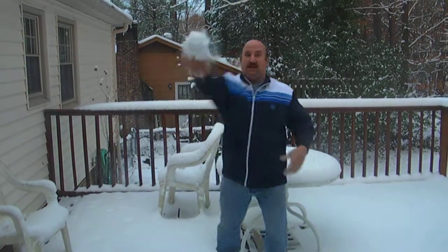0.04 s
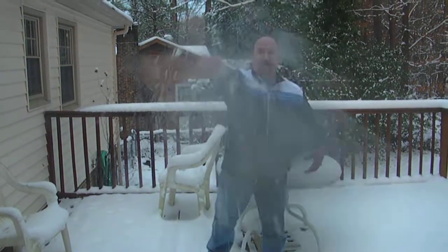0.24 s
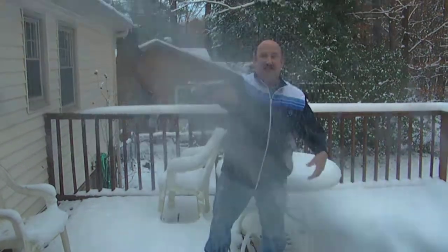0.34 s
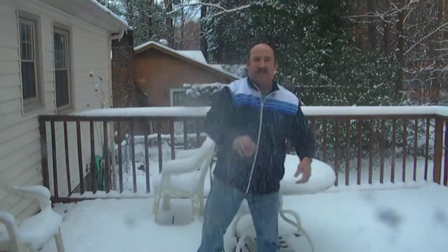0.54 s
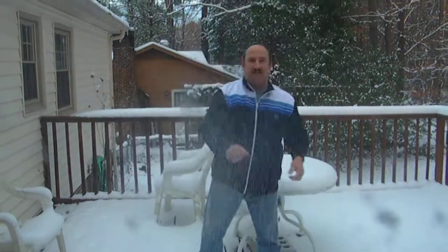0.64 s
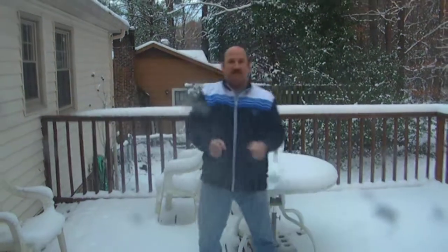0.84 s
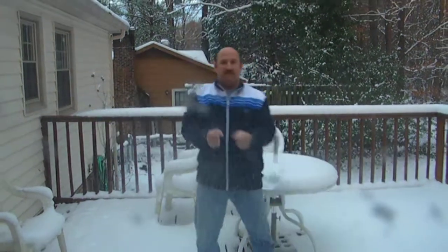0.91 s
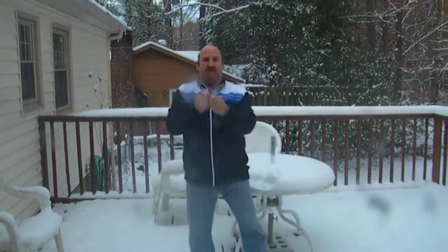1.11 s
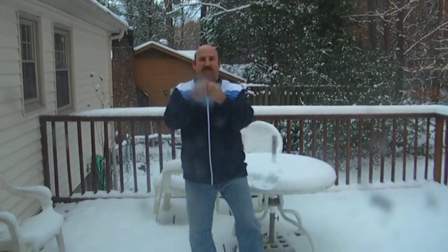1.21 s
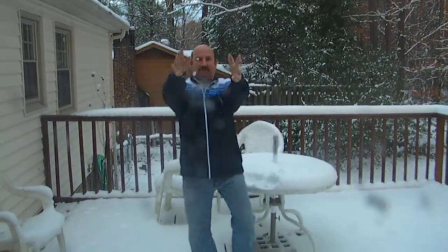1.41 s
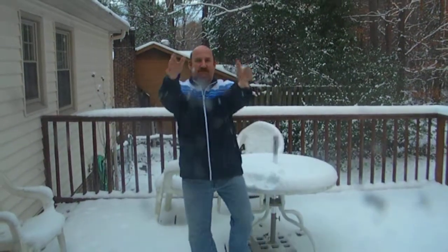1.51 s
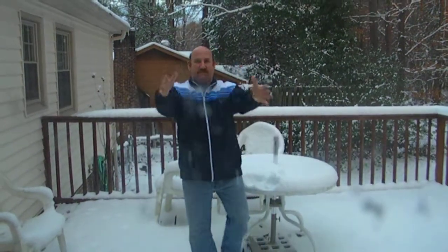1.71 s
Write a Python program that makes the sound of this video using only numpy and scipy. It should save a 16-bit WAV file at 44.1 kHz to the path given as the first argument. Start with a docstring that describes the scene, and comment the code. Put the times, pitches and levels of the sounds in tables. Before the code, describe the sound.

Snowball bursts against window glass, booming and rumbling, followed by faint microphone handling knocks.

```python
"""Quiet hum and hiss run throughout. At 0.24 s a snowball bursts on a large, close window pane
and briefly overloads the microphone. The snow smacks and crunches; the pane booms and rings on
in its low modes. Crumbs tick down the glass. From 0.6 s, soft handling knocks ring the camera's
case, each with a rustle; a second group follows at 1.6 s."""
import sys
import numpy as np
from scipy import signal
from scipy.fft import rfft, irfft
from scipy.io import wavfile

SR = 44100
rng = np.random.default_rng(int(sys.argv[2]) if len(sys.argv) > 2 else 0)


def dump(signal):
    """Clip the signal to [-1, 1] and save it as 16-bit WAV at the path in sys.argv[1]."""
    limited = np.clip(np.atleast_2d(signal).T, -1, 1)
    pcm = np.round(limited * 32767).astype(np.int16)
    wavfile.write(sys.argv[1], SR, pcm)


N = 77175
T = np.arange(N) / SR
HIT_S = 0.2417
PUSH_S = HIT_S + 0.0003   # the ball's loose outside yields first
BANDWIDTH_HZ = 8300


def pane():
    """One push shoves the window in its frame; low modes build up, dense upper modes ring at once."""
    # damped motion of the whole window: (frequency [Hz], level [dB], t60 [s])
    shove_modes = [(73.2, -2, .17), (148, 8, 0.047)]
    # low bending modes: (frequency [Hz], level [dB], t60 [s])
    low_modes = [(23, -25, .8), (37.32, -24.5, 2.6), (44.04, -10.5, 1.56), (57.73, -18.5, 1.7),
                 (60, -19.5, 0.39), (72.8, -24, 1.6), (82.5, -19, 1.93), (96.4, -17, 1.3),
                 (101.3, -18, 1.1), (105.7, -28, 2.9), (116.6, -20, 1.69), (142.7, -14.5, 2.024),
                 (155.9, -21.5, 1.47), (177.6, -22.5, 1.62), (185.7, -19.5, 1.57), (216.7, -15, 1.33),
                 (223.7, -1.5, 0.21), (245.9, -13, 0.76), (288.6, -18, 0.78), (300.9, -19.5, 0.88),
                 (327.3, -20.5, .33), (354.7, -24.5, 0.77), (375, -31, 1.48), (431.5, -33.5, 1.22),
                 (479, -31.5, 0.49), (462, -34.5, 0.53), (582, -21.5, 0.59), (620, -21, 0.31),
                 (900, -26.5, .4)]
    # upper mode heights: (frequency [Hz], level [dB])
    upper_spectrum = [(260, -26), (420, -33.5), (600, -42), (720, -47), (1000, -53), (1400, -60),
                      (2200, -56)]
    contact_s, build_up_s, upper_count = 0.001506, 0.015, 44
    force = push(PUSH_S, contact_s)
    shove = ring_alternating(force, shove_modes)
    build_up = np.clip((T - HIT_S) / build_up_s, 0, 1)   # bending waves return from the frame
    low = build_up * sum(from_db(db) * ring(force, hz, t60_s) for hz, db, t60_s in low_modes)
    upper_hz = np.geomspace(upper_spectrum[0][0], upper_spectrum[-1][0], upper_count)
    upper_hz *= 1 + 0.015 * rng.standard_normal(upper_count)
    sharp_force = push(PUSH_S, contact_s / 4)
    upper = np.zeros(N)
    for hz, sign in zip(upper_hz, rng.choice([-1, 1], upper_count)):
        t60_s = 0.81 * (500 / hz) ** 0.35
        upper += sign * from_db(db_at(upper_spectrum, hz)) * ring(sharp_force, hz, t60_s)
    return shove + upper - low


def snowball():
    """The ball flattens with a dull smack, collapses in a lumpy crunch and leaves a tinkling spray."""
    # packed snow flattening: (frequency [Hz], relative density [dB])
    smack_spectrum = [(400, 3), (600, 9), (720, -3), (900, -2.5), (1300, -10.5), (2000, -21), (4000, -43)]
    # snow fracturing: (frequency [Hz], relative density [dB])
    crunch_spectrum = [(900, -18), (2000, -13), (3000, -3), (3800, 2.5), (5500, 0.5), (8000, -3)]
    # fine snow showering: (frequency [Hz], relative density [dB])
    spray_spectrum = [(700, 10), (1400, 3.5), (2200, -9), (3000, -1), (3800, -1.5), (5000, -0.5),
                      (8000, -10.5)]
    lump_s, lump_spread_db = 0.0027, 2
    tinkle_hz, tinkle_width_hz = 3750, 350
    smack = from_db(-16) * envelope(PUSH_S, attack_s=0.002, t60_s=0.097)
    smack *= colour(rng.standard_normal(N), smack_spectrum)
    lumps = from_db(lump_spread_db * np.interp(T / lump_s, np.arange(N), rng.standard_normal(N)))
    crunch = from_db(-20) * lumps * envelope(HIT_S, attack_s=0.0004, hold_s=0.006, t60_s=0.058)
    crunch *= colour(grains(per_s=6000), crunch_spectrum)
    spray = from_db(-44.5) * envelope(HIT_S, attack_s=0.015, t60_s=1.0)
    spray *= colour(grains(per_s=9500), spray_spectrum)
    b, a = signal.iirpeak(tinkle_hz, tinkle_hz / tinkle_width_hz, fs=SR)
    tinkle = from_db(-54) * envelope(HIT_S, attack_s=0.015, hold_s=0.093, t60_s=0.32)
    tinkle *= unit_rms(signal.lfilter(b, a, grains(per_s=220)))
    return smack + crunch + spray + tinkle


def crumbs():
    """Each crumb ticks on the glass: a short cluster of grains in one resonance."""
    # crumb impacts: (time [s], level [dB], pitch [Hz], bandwidth / pitch before the cap [-], t60 [s])
    ticks = [(.2862, -31, 3540, 0.54, 0.0085), (0.3105, -41, 3630, 0.61, .014),
             (0.3186, -31.5, 3400, 0.69, 0.0061), (.361, -43, 3300, 1.0, 0.034),
             (0.4267, -47, 3585, 0.17, 0.079), (0.465, -47.5, 4470, 1.39, 0.16),
             (.599, -47.5, 3700, 1.16, 0.032), (1.2759, -37, 2950, 2.8, 0.014)]
    out = np.zeros(N)
    for start_s, db, hz, width, t60_s in ticks:
        b, a = signal.iirpeak(hz, 1 / min(width, 2), fs=SR)
        grit = signal.lfilter(b, a, signal.lfilter(b, a, grains(per_s=7300)))
        out += from_db(db) * envelope(start_s, attack_s=0.00078, t60_s=t60_s) * unit_rms(grit)
    return out


def handling_knocks():
    """Soft contacts ring the case briefly, each with a little rustle."""
    # touches on the case: (time [s], force level [dB], rustle level [dB])
    contacts = [(0.614, -44, -48.5), (.634, -48, -52), (.659, -57, -45.5), (0.702, -42, -50.5),
                (.777, -51.5, -51), (.809, -33, -49), (0.833, -47, -52), (0.868, -43, -58),
                (0.901, -48, -48.5), (.935, -44.5, -53), (.971, -57, -51), (1.021, -34.5, -47),
                (1.069, -41.5, -53), (1.63, -43, -46), (1.672, -46, -51), (1.701, -45.5, -53.5),
                (1.743, -35, -44.5)]
    # case resonances: (frequency [Hz], level [dB], t60 [s])
    case_modes = [(236.6, 5.5, 0.065), (319, 6.5, .05)]
    # rubbing noise: (frequency [Hz], relative density [dB])
    rustle_spectrum = [(400, -36), (700, 0), (1100, 1), (1700, -7), (2600, -13), (8000, -12.5)]
    force = sum(from_db(db) * push(start_s, length_s=0.002) for start_s, db, _ in contacts)
    thuds = ring_alternating(force, case_modes)
    rubbing = sum(from_db(db) * envelope(start_s, attack_s=0.0027, t60_s=0.052)
                  for start_s, _, db in contacts)
    return thuds + rubbing * colour(rng.standard_normal(N), rustle_spectrum)


def hum_and_hiss():
    """Steady hum and a thin electronic whine over even hiss."""
    # hum and whine: (frequency [Hz], rms level [dB])
    tones = [(59.2, -45.5), (199.2, -59.5), (409, -63.5), (969, -72.5), (7731, -68), (8269, -75)]
    # noise floor: (frequency [Hz], relative density [dB])
    hiss_spectrum = [(47, -39.5), (80, -1.5), (135, -2), (173, -6), (206, -4), (231, -8), (333, -15),
                     (374, -13), (420, -14), (679, -18), (979, -20.5), (1260, -23.5), (8000, -24),
                     (10400, -72), (17600, -120)]
    hum = sum(np.sqrt(2) * from_db(db) * np.sin(2 * np.pi * (hz * T + rng.random())) for hz, db in tones)
    return hum + from_db(-49.5) * colour(rng.standard_normal(N), hiss_spectrum)


def from_db(db):
    """Decibels to gain."""
    return 10 ** (np.asarray(db) / 20)


def unit_rms(x):
    """Scale to rms 1."""
    return x / np.sqrt(np.mean(x ** 2) + 1e-20)


def db_at(spectrum, hz):
    """Interpolate a spectrum on a log-frequency axis."""
    points_hz, points_db = np.transpose(spectrum)
    return np.interp(np.log(hz + 1e-3), np.log(points_hz), points_db)


def colour(noise, spectrum):
    """Shape noise to a spectrum, rolled off below its first point and cut at BANDWIDTH_HZ; rms 1."""
    hz = np.arange(N // 2 + 1) * SR / N
    edges = (hz < BANDWIDTH_HZ) * np.minimum(hz / spectrum[0][0], 1) ** 2
    return unit_rms(irfft(rfft(noise) * from_db(db_at(spectrum, hz)) * edges, N))


def envelope(start_s, attack_s, t60_s, hold_s=0):
    """Linear rise, hold, exponential fall."""
    age_s = T - start_s
    falling_s = np.maximum(age_s - attack_s - hold_s, 0)
    return np.clip(age_s / attack_s, 0, 1) * np.exp(-np.log(1000) * falling_s / t60_s)


def push(start_s, length_s):
    """Half-sine contact force of unit area."""
    force = np.sin(np.pi * np.clip((T - start_s) / length_s, 0, 1))
    return force / (force.sum() + 1e-9)


def ring(force, hz, t60_s):
    """One mode: a unit impulse starts a decaying sine of height 1."""
    radius = np.exp(-np.log(1000) / (t60_s * SR))
    step_rad = 2 * np.pi * hz / SR
    return signal.lfilter([0, np.sin(step_rad)], [1, -2 * radius * np.cos(step_rad), radius ** 2],
                          force + 1e-18)


def ring_alternating(force, modes):
    """Sum of driven modes with alternating signs."""
    return sum((-1) ** k * from_db(db) * ring(force, hz, t60_s) for k, (hz, db, t60_s) in enumerate(modes))


def grains(per_s):
    """Tiny fractures of random size at random times."""
    return (rng.random(N) < per_s / SR) * rng.standard_normal(N)


def scene():
    """All sources at one microphone."""
    return (pane() + snowball() + crumbs() + handling_knocks() + hum_and_hiss())[None]


def record(dry):
    """Band limit, hard clipping on the hit, then a final low-pass."""
    clip_level, cutoff_hz = 0.705, 15400
    narrow = signal.sosfilt(signal.ellip(8, 0.3, 60, BANDWIDTH_HZ, fs=SR, output="sos"), dry)
    clipped = np.clip(narrow, -clip_level, clip_level)
    return signal.sosfilt(signal.ellip(10, 0.1, 70, cutoff_hz, fs=SR, output="sos"), clipped)


dry = scene()
out = record(dry)
dump(out)
```